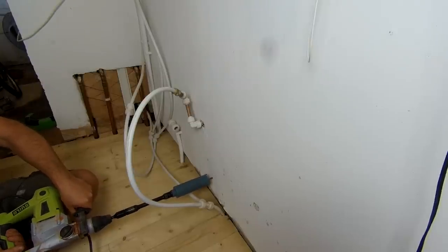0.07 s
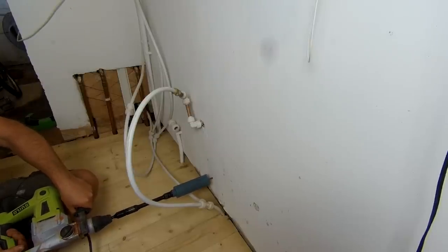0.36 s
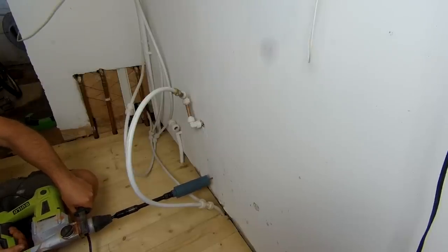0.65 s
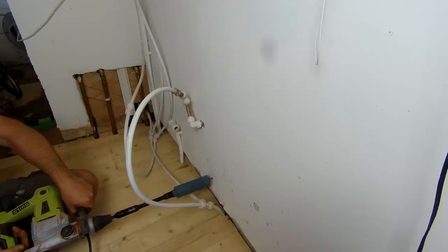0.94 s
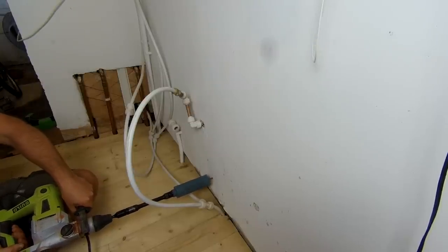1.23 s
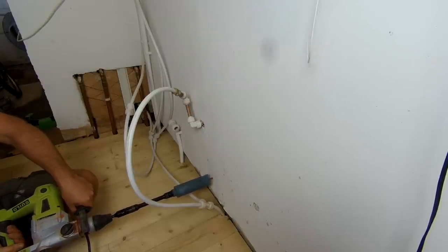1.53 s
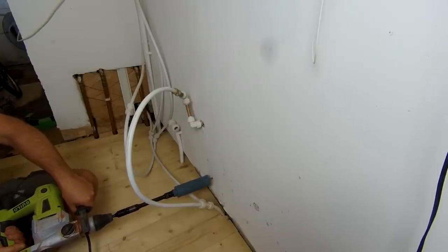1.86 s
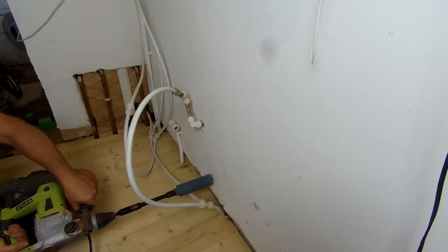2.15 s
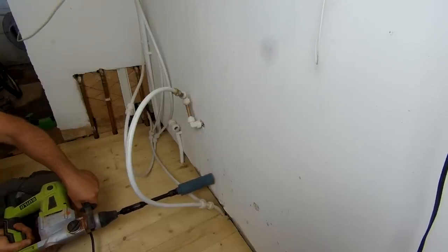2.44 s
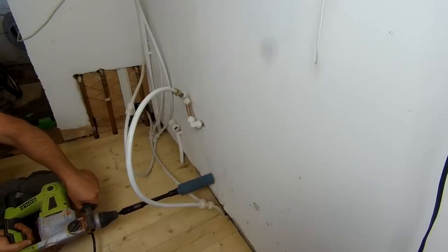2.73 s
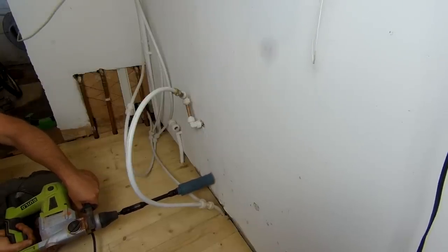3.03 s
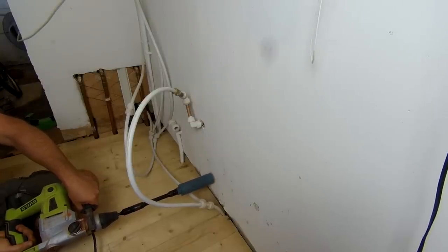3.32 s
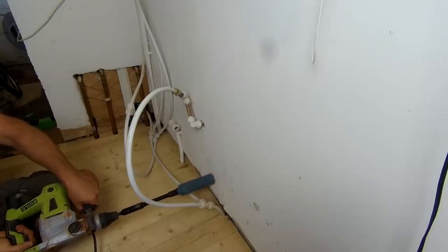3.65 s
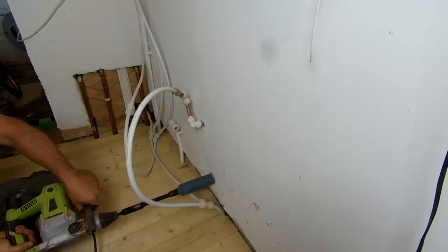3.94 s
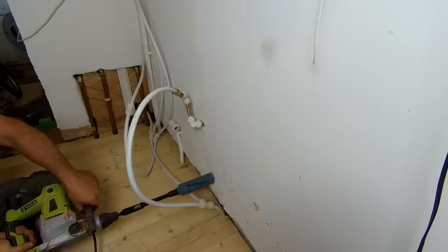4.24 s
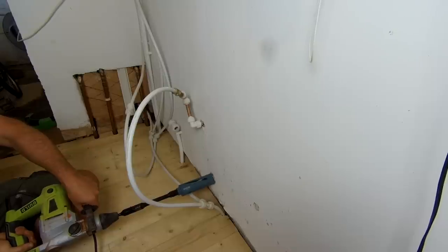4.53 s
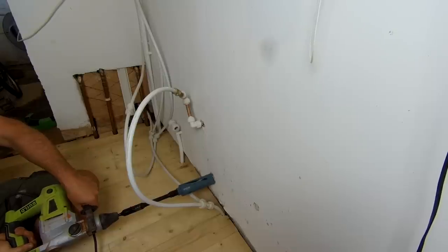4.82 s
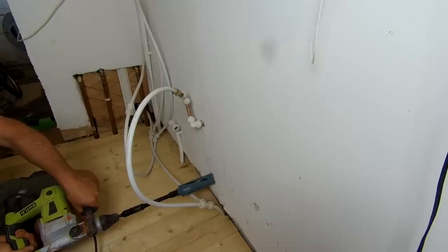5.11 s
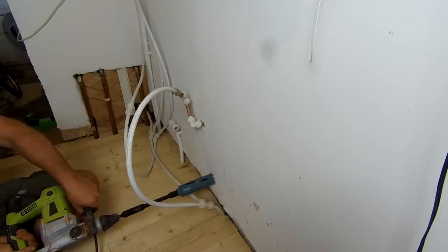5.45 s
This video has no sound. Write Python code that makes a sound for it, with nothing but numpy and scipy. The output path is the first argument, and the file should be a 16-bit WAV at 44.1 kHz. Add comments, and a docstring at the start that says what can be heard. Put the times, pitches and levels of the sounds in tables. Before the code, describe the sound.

A corded drill whines in two bursts, then its large bit grinds against a wall and squeals as it winds down.

```python
"""A corded drill spins a large core bit in a small bare room.
First a short squeeze of the trigger: the gears whine and the fan whistles, then the motor coasts with
metal knocks and a rattling shank (the stem of the bit). A second, longer squeeze starts with a clatter,
and the bit bites into the wall and grinds. The trigger is let go, and the steel rim sticks and slips,
squealing as it slows. Last comes a clack as the drill runs down to a stop."""
import sys
import numpy as np
from scipy import signal
from scipy.fft import rfft, irfft, next_fast_len
from scipy.io import wavfile
from scipy.ndimage import uniform_filter1d

SR = 44100
rng = np.random.default_rng(int(sys.argv[2]) if len(sys.argv) > 2 else 0)


def wav_out(sig):
    """Save sig, one row per channel (or a flat mono array), as 16-bit PCM at SR to the path in sys.argv[1]."""
    wavfile.write(sys.argv[1], SR, np.round(np.clip(np.atleast_2d(sig).T, -1, 1) * 32767).astype(np.int16))


N = 250399
TIME = np.arange(N) / SR
FFT_SIZE = next_fast_len(N + SR // 10, True)
FFT_HZ = np.fft.rfftfreq(FFT_SIZE, 1 / SR)

BITE_S = 2.255  # the rim meets the wall
CHURN_DB, CHURN_DB_PER_DOUBLING = -20, 8.63  # how gear sound follows the motor speed
# The bright rasp of the running tool and its rattle. Each row: frequency in Hz, relative level in dB.
RASP_SPECTRUM = [(600, -28), (1500, -13.5), (2300, -1), (3500, 3), (4800, 3), (6200, 3.5), (7400, -3.5),
                 (9000, -17), (12000, -14), (16000, -45.5)]


def motor_shaft(start_speed=200, free_speed=537.7, jitter=.0015):
    """Speed (turns a second) and angle of the shaft, which speeds up under power and coasts on drag."""
    full_pull, bearing_drag, wall_drag = 5065, 87.1, 43.6  # turns a second gained or lost each second
    air_drag_s, pull_fade = 2.586, 2.115
    steps, dt = np.linspace(0, N / SR, 5680, retstep=True)
    now, speeds = start_speed, []
    for s, powered in zip(steps, np.interp(steps, TIME, trigger_held())):
        speeds.append(now)
        pull = full_pull * (1 - now / free_speed) ** pull_fade
        drag = now / air_drag_s + bearing_drag + wall_drag * (s > BITE_S)
        now = max(now + dt * (pull if powered else -drag), 1e-3)
    speed = np.interp(TIME, steps, speeds) * (1 + jitter * wander(60))
    return speed, 2 * np.pi * np.cumsum(speed) / SR


def trigger_held():
    """One while the trigger is held, zero otherwise."""
    # Each row: time pulled in seconds, time let go in seconds.
    squeezes = [(0, .165), (1.561, 2.378)]
    return sum(1. * (TIME >= pulled) * (TIME < released) for pulled, released in squeezes)


def running_noise(speed, angle, wall_churn_db=2, wall_rasp_db=1, flutter_db=1.87):
    """Gears, motor brushes and fan air pulse with each gear tooth; the wall makes the gears work harder."""
    # The low churn of the gears. Each row: frequency in Hz, relative level in dB.
    churn_spectrum = [(20, -53), (70, -36.5), (125, -18.5), (190, -18), (330, -6.5), (520, -6), (800, -1.5),
                      (1250, 1), (1600, 1.5), (2200, 0), (3200, -8.5), (6000, -21.5)]
    # The high hiss of brushes and fan. Each row: frequency in Hz, relative level in dB.
    air_spectrum = [(4000, -35.5), (7000, 0.5), (8500, -3), (10000, 1.5), (11500, -2), (12500, -8),
                    (14000, -9.5), (15600, -26)]
    churn = speed_gain(speed, CHURN_DB, CHURN_DB_PER_DOUBLING) * amp(wall_churn_db * on_wall())
    rasp = speed_gain(speed, db=-14, db_per_doubling=8.6) * amp(wall_rasp_db * on_wall())
    brushes = speed_gain(speed, db=-18.5, db_per_doubling=9)
    fan = speed_gain(speed, db=-20.5, db_per_doubling=26)
    teeth = 1 + .19 * np.cos(4 * angle)  # the shaft's gear has four teeth
    flutter = amp(flutter_db * wander(45))
    noise = churn * colour(teeth * grit(7000, 2.1), churn_spectrum)
    noise += rasp * flutter * colour(teeth * grit(7000, 2.8), RASP_SPECTRUM)
    noise += np.hypot(brushes, fan) * np.sqrt(flutter) * colour(teeth * grit(14000, 2.5), air_spectrum)
    return housing(noise)


def whine(speed, angle, gears_db=-2, power_lift_db=3, hum_db=-42, fan_blades=25):
    """Gear tones, motor hum and fan whistle follow the shaft; slack between teeth makes the gears waver."""
    # Tones of the off-balance shaft and the teeth. Each row: cycles per shaft turn, relative level in dB.
    gear_tones = [(1, -14.5), (2, -12), (4, -8), (8, -6.5), (12, -4.5), (16, -7), (20, -4)]
    # How well the gear case lets a tone out. Each row: frequency in Hz, gain in dB.
    gear_case = [(100, -30), (250, -16), (340, -6), (450, -4), (620, -8), (780, -8), (950, -3), (1300, 1.5),
                 (2000, 2), (2700, -6), (3600, -4), (6000, -8)]
    # How well the vents let the fan whistle out. Each row: frequency in Hz, gain in dB.
    vents = [(400, -80.5), (4000, -39), (5100, -31.5), (5900, -32), (6900, -33), (7600, -20), (9000, -24),
             (11500, -19)]
    powered = uniform_filter1d(trigger_held(), size=2000)
    load = speed_gain(speed, CHURN_DB, CHURN_DB_PER_DOUBLING) * amp(gears_db + power_lift_db * powered)
    gears = np.zeros(N)
    for cycles, db in gear_tones:
        level = amp(db + look_up(gear_case, cycles * speed) + 2.2 * wander(20))
        gears += level * np.cos(cycles * angle + .5 * wander(60))
    hum = powered * amp(hum_db + look_up(gear_case, speed)) * np.cos(angle)
    whistle = amp(look_up(vents, fan_blades * speed) + 1.5 * wander(40)) * np.cos(fan_blades * angle)
    return np.sqrt(2) * housing(load * gears + hum + whistle)


def high_speed_ringing(speed, width_hz=190, steepness=12):
    """A high, fuzzy ring sets in once the motor and fan spin fast enough."""
    # Each row: pitch in Hz, full level in dB, shaft speed where it sets in, in turns a second.
    rings = [(8560, -22.5, 360), (5720, -24, 320)]
    out = np.zeros(N)
    for hz, db, onset_speed in rings:
        phase = 2 * np.pi * hz * TIME
        drive = (speed / onset_speed) ** steepness
        fuzzy_tone = wander(width_hz) * np.cos(phase) + wander(width_hz) * np.sin(phase)
        out += amp(db) * drive / (1 + drive) * fuzzy_tone
    return out


def metal_knocks(speed, knock_db=-1, decay_s=.0071, rattle_db=-26, rattle_speed=215, speed_range=38):
    """Sharp metal knocks from the drill, including a clatter as the trigger is pulled."""
    # The loudest knocks. Each row: start in seconds, relative level in dB.
    knock_times = [(.086, -11.5), (.137, -16.5), (0.211, -9), (0.284, -12.5), (.727, -13), (0.758, -12),
                   (0.767, -12.5), (0.8404, -11), (.854, -11), (.874, -9.5), (.93, -14.5), (.941, -12),
                   (1.068, -18.5), (1.172, -18), (1.547, -19), (1.556, -17), (1.614, -12.5), (3.695, -17.5),
                   (4.315, -18.5)]
    # The steel chatter of a knock. Each row: frequency in Hz, relative level in dB.
    knock_spectrum = [(100, -27.5), (600, -14.5), (1500, -4), (2500, 3), (4000, 3), (5800, -11.5),
                      (8000, -16.5), (11500, -9), (15500, -32.5)]
    knock_level = amp(knock_db) * bursts([(s, db, decay_s) for s, db in knock_times])
    # the loose shank also rattles at some speeds while coasting clear of the wall
    coasting_free = (1 - trigger_held()) * (1 - on_wall())
    loose = coasting_free * np.exp(-((speed - rattle_speed) / speed_range) ** 2)
    rattle_level = loose * amp(rattle_db + 3 * wander(50))
    knocks = knock_level * colour(rng.standard_normal(N), knock_spectrum)
    rattle = rattle_level * colour(rng.standard_normal(N), RASP_SPECTRUM)
    return housing(knocks + rattle)


def housing(x):
    """The drill's body and bit ring at their own pitches, colouring whatever shakes them."""
    # Each row: pitch in Hz, width in Hz, boost in dB.
    resonances = [(360, 10, 4.5), (639.6, 19, 7.5), (772, 30, 5), (883, 130, 6), (1149, 110, 5),
                  (1310, 45, 3.5), (1805, 40, -2), (1960, 54, 4.5), (2210, 45, 4), (2990, 40, 2),
                  (3540, 90, 0.5), (4060, 180, 2.5), (5610, 250, 2.5), (8670, 230, 5), (9540, 250, 4)]
    lift = sum((amp(db) - 1) / (1 + 2j * (FFT_HZ - hz) / width) for hz, width, db in resonances)
    return irfft(rfft(x, FFT_SIZE) * (1 + lift), FFT_SIZE)[:N]


def wall_grinding(speed, judder_db=2):
    """The toothed rim judders on the wall, which booms under the crumbling grit."""
    # The boom of the wall. Each row: frequency in Hz, relative level in dB.
    wall_spectrum = [(25, -13.5), (45, -4.5), (90, -1), (130, 3.5), (175, -7), (250, -2.5), (340, 4.5),
                     (500, -4), (650, 5.5), (900, 3.5), (1400, -0.5), (2500, -5), (6000, -25),
                     (15000, -45.5)]
    # Teeth catching in the wall. Each row: start in seconds, level in dB, fade time in seconds.
    bites = [(2.257, -3.5, 0.01), (3.650, -21.5, 0.014)]
    pressure = on_wall() * speed_gain(speed, db=-22, db_per_doubling=8.6) * amp(judder_db * wander(70))
    return (pressure + bursts(bites)) * colour(grit(3500, 2), wall_spectrum)


def on_wall():
    """Rises quickly from zero to one when the rim meets the wall."""
    return np.clip((TIME - BITE_S) / .003, 0, 1)


def rim_squealing(pitch_sag=.25, pitch_scatter=.085, rasp_db=4, attack_s=.002, ring_s=.004):
    """The steel rim sticks and slips; a rough slip sags in pitch and wavers in pitch and strength."""
    # Each row: start in seconds, length in seconds, level in dB, pitch in Hz, roughness from 0 to 1.
    squeals = [ (2.732, .011, -12.5, 2460, .3), (2.822, .018, -7, 2530, .35),
               (2.863, .015, -8.5, 2370, .25), (2.925, .016, -18.5, 2710, .6),
               (2.962, .024, -10.5, 2350, .25), (3.032, .014, -13, 2790, .6), (3.074, .026, -9.5, 2500, .3),
               (3.157, .024, -8, 2830, .7), (3.203, .032, -16, 2390, .35), (3.295, .02, -11, 2720, .75),
               (3.359, .034, -21, 2510, .3), (3.519, .019, -11, 2650, .25), (3.744, .026, -12.5, 2610, .28),
               (3.924, 0.007, -21, 2980, 0.2), (3.938, 0.014, -16, 2860, .1),
               (4.053, .023, -14.5, 2770, 0.06), (4.066, 0.017, -16, 2568, .25)]
    out, unsteady, grip = np.zeros(N), wander(450), wander(330)
    t = TIME[:SR // 10]
    for start, length, db, pitch_hz, rough in squeals:
        at = round(start * SR) + np.arange(len(t))
        sag = pitch_sag * (.5 - np.minimum(t / length, 1))
        hz = pitch_hz * (1 + rough * (sag + pitch_scatter * unsteady[at]))
        phase = 2 * np.pi * np.cumsum(hz) / SR
        overtones = sum(amp(-10.5 - 10 * k) * np.sin((k + 2) * phase + .91 * grip[at]) for k in range(3))
        # the slip starts abruptly, holds, and rings out
        shape = np.minimum(t / attack_s, 1) * np.exp(-np.maximum(t - .87 * length, 0) / ring_s)
        level = amp(db + rasp_db * rough * grip[at])
        out[at] += shape * level * np.sqrt(2) * (np.sin(phase) + overtones)
    return out


def room(x, echo_db, pan_db, sway_hz=2):
    """Direct sound reaches the left side late; the echoes keep changing as the tool sways."""
    # Each row: frequency in Hz, how far the left side is ahead in radians (negative is behind).
    left_lead = [(20, 0), (600, -.25), (3000, -.35), (5500, -.5), (7000, -.9), (8500, -1.7), (10200, -2.1),
                 (15200, -3.2)]
    # Each row: frequency in Hz, how much louder the left side is in dB, before pan_db is added.
    balance = [(60, -12), (110, 4), (200, -1), (380, -2), (700, 1.5), (1290, -2.5), (2380, 0), (4400, -0.5),
               (8120, 0.5), (15000, -0.5)]
    sway = 2 * np.pi * sway_hz * TIME
    # fade between three sets of echoes
    shares = [np.sqrt(2 / 3) * np.cos(sway + np.pi * k / 3) for k in range(3)]
    echo = sum(signal.oaconvolve((x * share)[None], wall_echoes(), axes=1)[:, :N] for share in shares)
    side = np.array([[.5], [-.5]])
    direct = rfft(x, FFT_SIZE) * np.exp(1j * side * look_up(left_lead, FFT_HZ))
    both = (direct + amp(echo_db) * blend_sides(*rfft(echo, FFT_SIZE))) / np.hypot(1, amp(echo_db))
    return irfft(both * amp(side * (look_up(balance, FFT_HZ) + pan_db)), FFT_SIZE)[:, :N]


def wall_echoes(per_s=3000):
    """One set of left and right echoes off bare walls; each frequency fades at its own rate."""
    # Each row: frequency in Hz, seconds to fade by 60 dB.
    fade_times = [(100, 0.49), (500, 0.27), (2500, 0.44), (8000, 0.16), (15000, 0.38)]
    taps = rng.choice([-1., 1.], (2, SR // 2)) * (rng.random((2, SR // 2)) < per_s / SR)
    taps[:, :round(.002 * SR)] = 0
    hz, t, bands = signal.stft(taps, SR, nperseg=256)
    near_walls = 1 + 1.1 * np.exp(-t / .0052)
    fade = amp(-60 * t / look_up(fade_times, hz)[:, None])
    tail = signal.istft(bands * near_walls * fade, SR, nperseg=256)[1]
    return tail / np.linalg.norm(tail, axis=1, keepdims=True)


def blend_sides(left, other):
    """Turns two unrelated spectra into the partly alike left and right sound of a room."""
    # Each row: frequency in Hz, likeness of the sides from -1 (opposite) to 1 (the same).
    likeness = [(50, .8), (300, -0.41), (1000, 0.48), (3000, 0.61), (6000, -0.28), (12000, 0.62)]
    same = np.clip(look_up(likeness, FFT_HZ), -1, 1)
    return np.array([left, same * left + np.sqrt(1 - same ** 2) * other])


def room_tone(hiss_db=-54, rumble_db=-64, lumps_db=7):
    """Faint hiss, a lumpy deep rumble and a few wavering tones."""
    # The room's hiss. Each row: frequency in Hz, relative level in dB.
    hiss_spectrum = [(15, -23), (30, -17), (60, -27.5), (95, -17), (150, -30), (300, -26.5), (500, -38.5),
                     (1100, -47), (2800, -51.5), (3700, -56), (4550, -51.5), (5100, -55.5), (5700, -51.5),
                     (7500, -57.5), (15000, -70)]
    # Faint tones in the room. Each row: pitch in Hz, level in dB.
    hum_tones = [(97, -68), (205, -66), (300, -75.5), (2514, -86), (3252, -86.5), (4520, -79.5),
                 (5600, -87.5)]
    noise = irfft(blend_sides(*rfft(rng.standard_normal((2, FFT_SIZE)))), FFT_SIZE)
    rumble = amp(rumble_db + lumps_db * wander(5)) * np.array([wander(26), wander(26)])
    hum = np.zeros(N)
    for hz, db in hum_tones:
        phase = 2 * np.pi * np.cumsum(hz * (1 + .0087 * wander(40))) / SR
        hum += amp(db) * np.sqrt(2) * np.sin(phase)
    return amp(hiss_db) * colour(noise, hiss_spectrum) + rumble + hum


def speed_gain(speed, db, db_per_doubling, work_speed=400, stall_speed=12):
    """Gain of a noise that has level db at working speed, grows with speed and dies as the shaft stops."""
    return amp(db + db_per_doubling * np.log2(speed / work_speed)) * speed / np.hypot(speed, stall_speed)


def bursts(rows):
    """Loudness over time of blows that start at once and die away."""
    return sum(amp(db) * (TIME >= s) * np.exp(-abs(TIME - s) / decay) for s, db, decay in rows)


def grit(per_s, spread_db):
    """A dense rain of tiny impacts of uneven size."""
    size = amp(spread_db * np.minimum(rng.exponential(1, N), 4))
    return unit(size * rng.choice([-1, 1], N) * (rng.random(N) < per_s / SR))


def wander(rate_hz):
    """A smooth random wobble of strength 1."""
    spectrum = rfft(rng.standard_normal(FFT_SIZE)) * np.exp(-(FFT_HZ / rate_hz) ** 2)
    return unit(irfft(spectrum, FFT_SIZE)[:N])


def colour(x, spectrum):
    """Filters x by a table of levels, then scales it to strength 1."""
    return unit(irfft(rfft(x, FFT_SIZE) * amp(look_up(spectrum, FFT_HZ)), FFT_SIZE)[..., :N])


def look_up(table, hz):
    """Reads between the rows of a table on a log-frequency axis."""
    row_hz, value = np.transpose(table)
    return np.interp(np.log(hz + 1), np.log(row_hz + 1), value)


def unit(x):
    """Scales x to an average strength (rms) of 1."""
    return x / np.sqrt(np.mean(x ** 2) + 1e-20)


def amp(db):
    """Turns decibels into a gain."""
    return 10 ** (np.asarray(db) / 20)


def scene():
    """The drill, its bit and the wall all sound in the same quiet room."""
    speed, angle = motor_shaft()
    tool = room(running_noise(speed, angle) + high_speed_ringing(speed), echo_db=-2, pan_db=0)
    tones = room(whine(speed, angle), echo_db=-4, pan_db=1)
    knocks = room(metal_knocks(speed), echo_db=-5, pan_db=0)
    wall = room(wall_grinding(speed), echo_db=-4.5, pan_db=.5)
    rim = room(rim_squealing(), echo_db=-6.5, pan_db=-3.5)
    return tool + tones + knocks + wall + rim + room_tone()


def record(dry, ceiling=.99, top_hz=15700):
    """Flattens any peak above the ceiling, then cuts the highest treble."""
    low_pass = signal.firwin(511, top_hz, window=("kaiser", 9), fs=SR)
    return signal.oaconvolve(np.clip(dry, -ceiling, ceiling), low_pass[None], "same")


dry = scene()
out = record(dry)
wav_out(out)
```